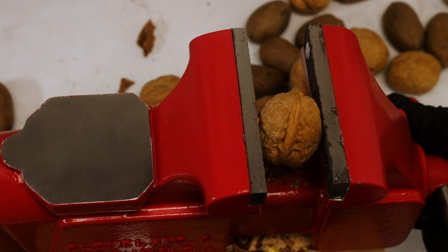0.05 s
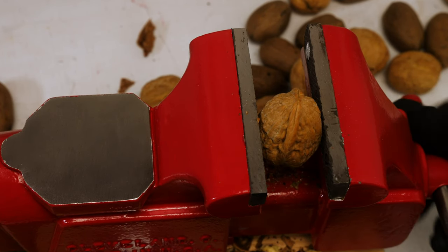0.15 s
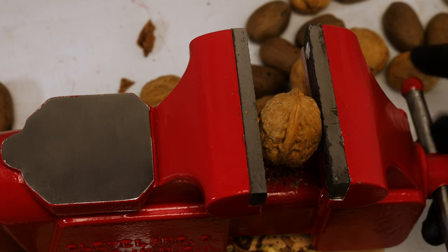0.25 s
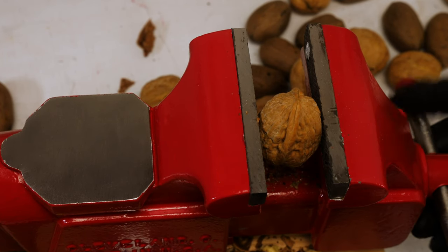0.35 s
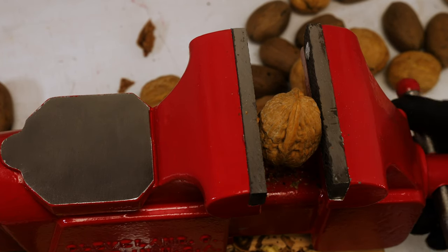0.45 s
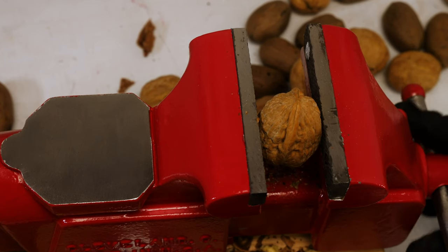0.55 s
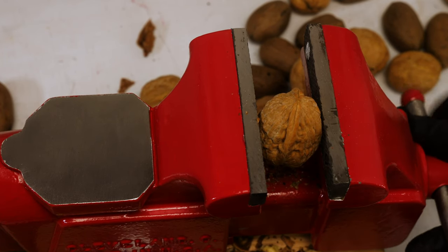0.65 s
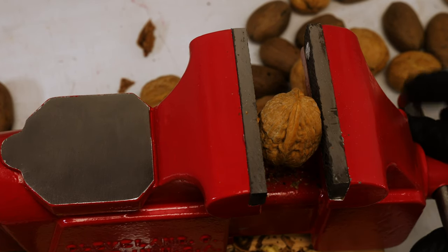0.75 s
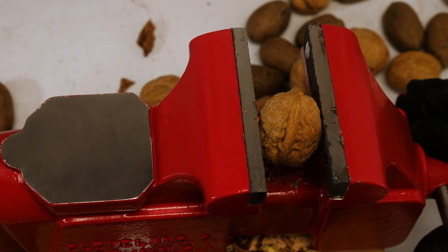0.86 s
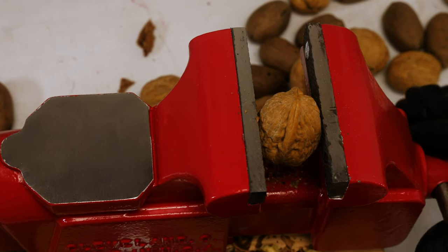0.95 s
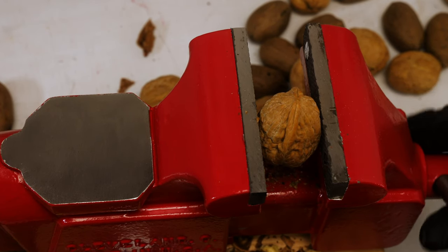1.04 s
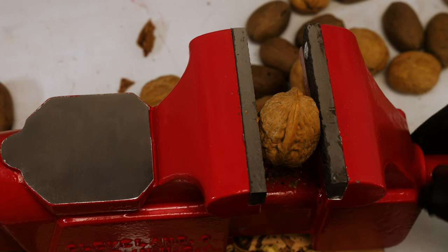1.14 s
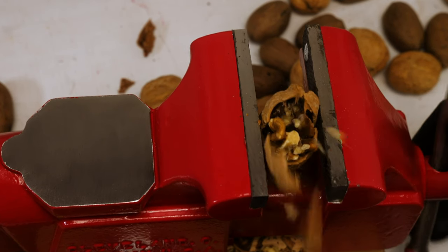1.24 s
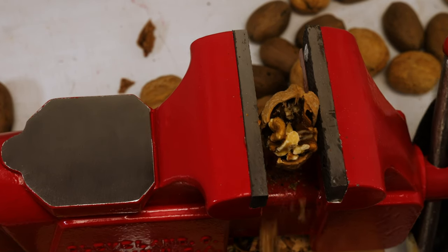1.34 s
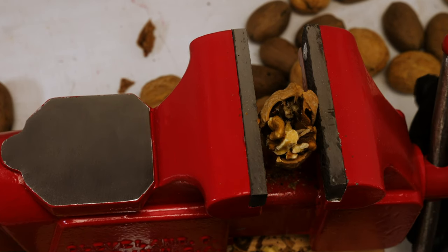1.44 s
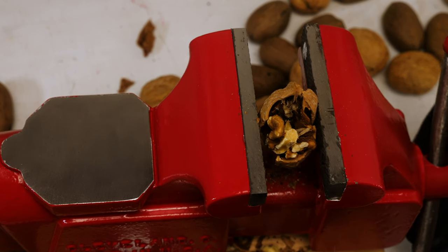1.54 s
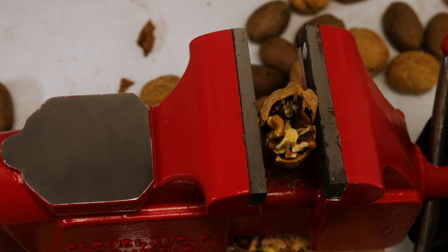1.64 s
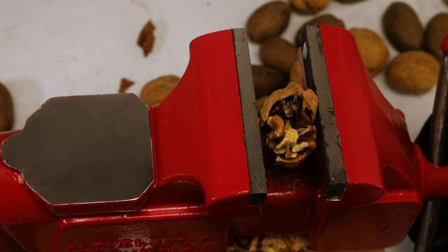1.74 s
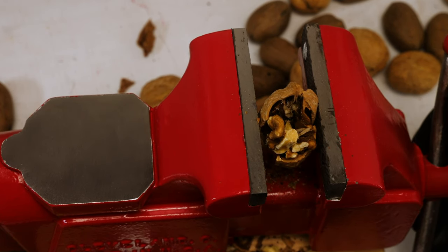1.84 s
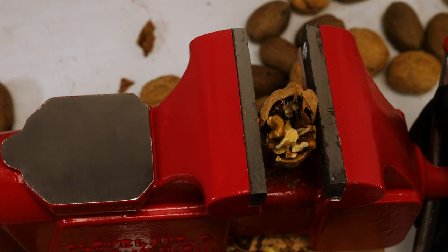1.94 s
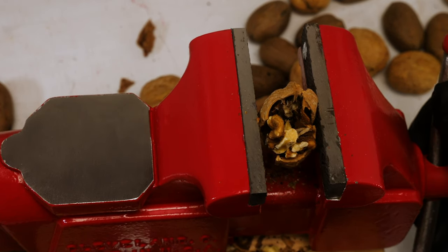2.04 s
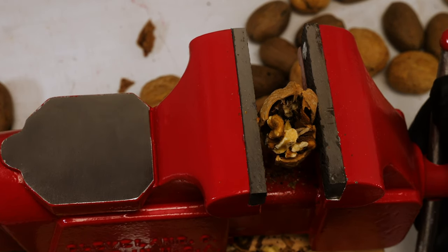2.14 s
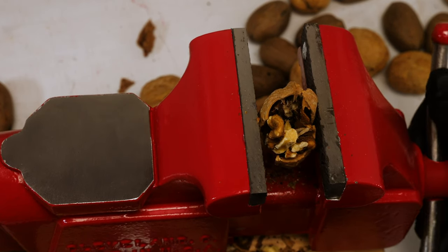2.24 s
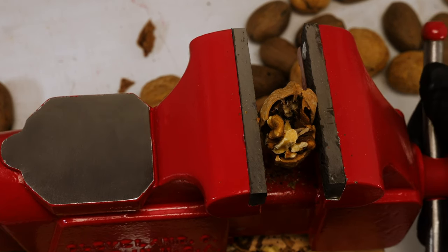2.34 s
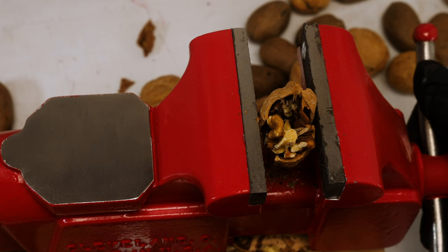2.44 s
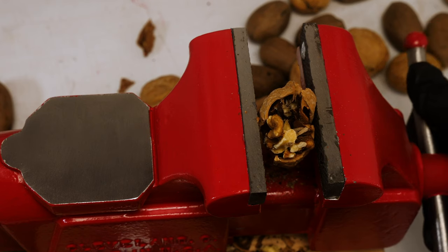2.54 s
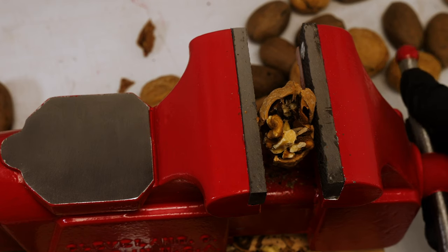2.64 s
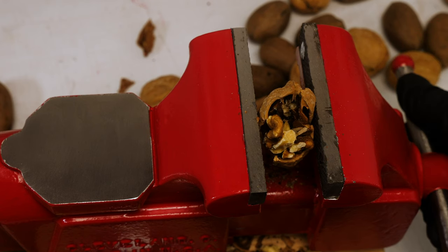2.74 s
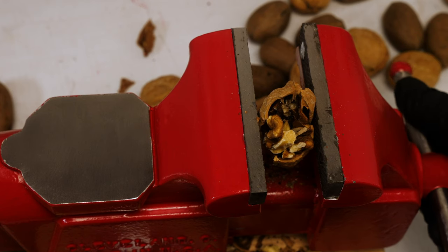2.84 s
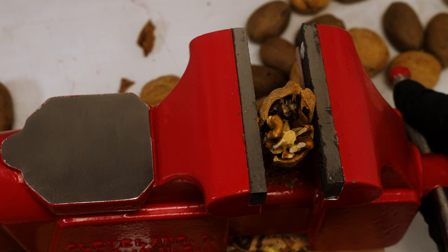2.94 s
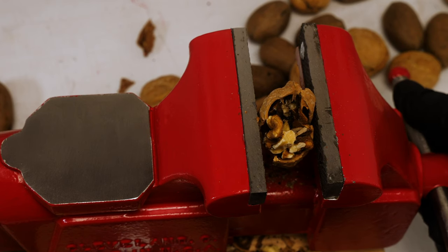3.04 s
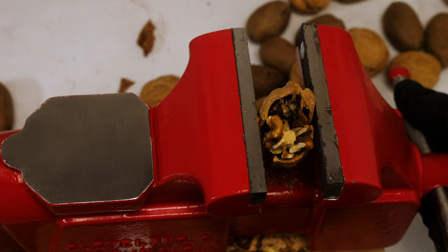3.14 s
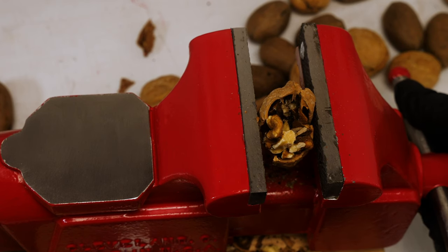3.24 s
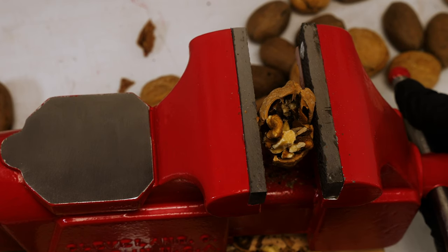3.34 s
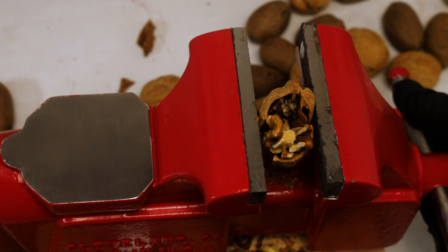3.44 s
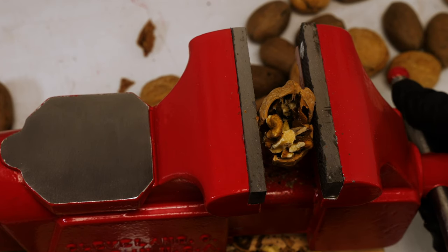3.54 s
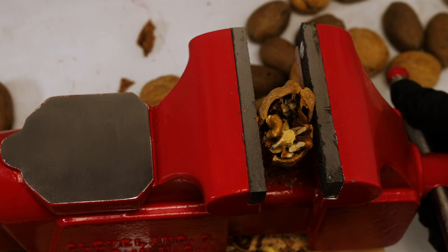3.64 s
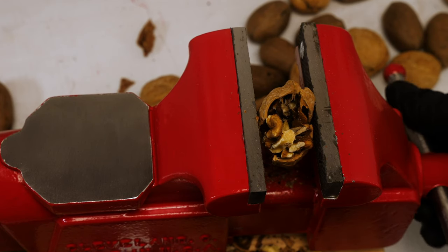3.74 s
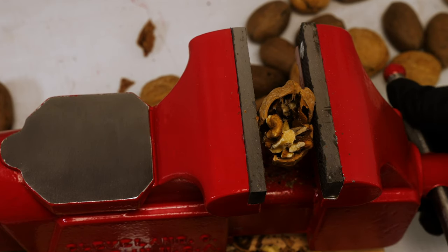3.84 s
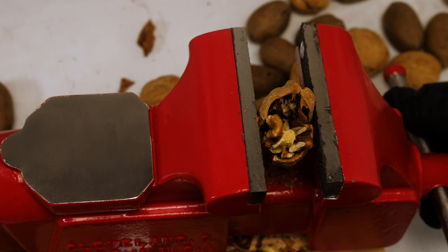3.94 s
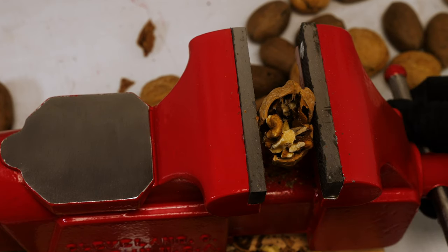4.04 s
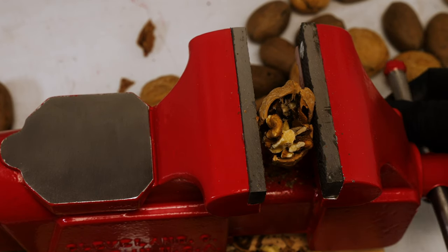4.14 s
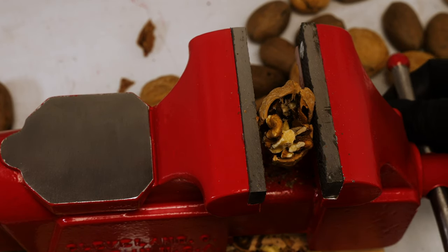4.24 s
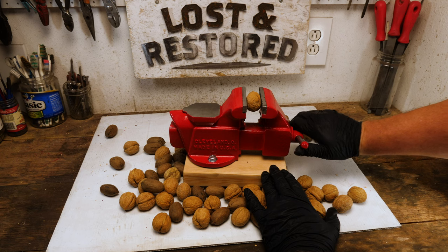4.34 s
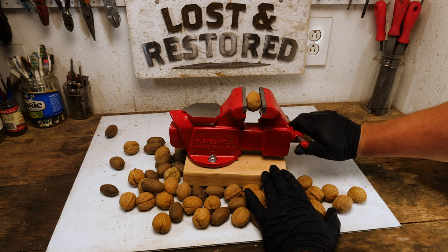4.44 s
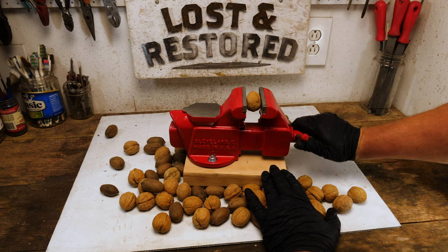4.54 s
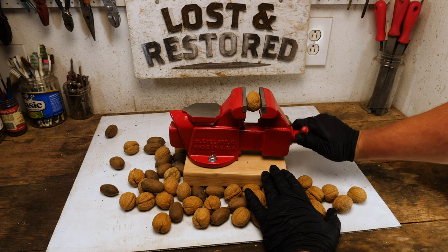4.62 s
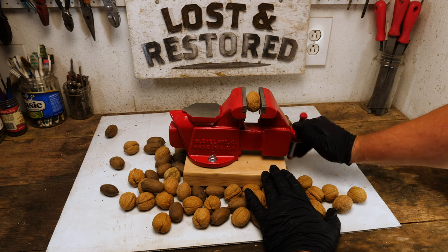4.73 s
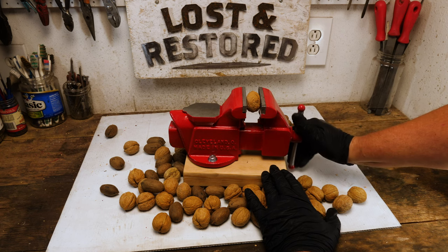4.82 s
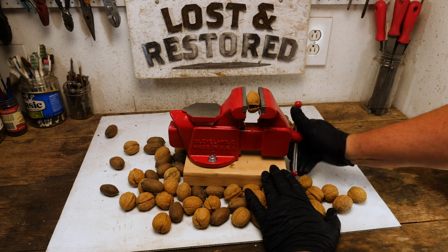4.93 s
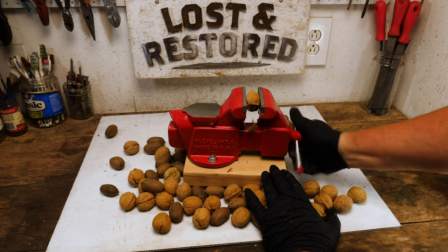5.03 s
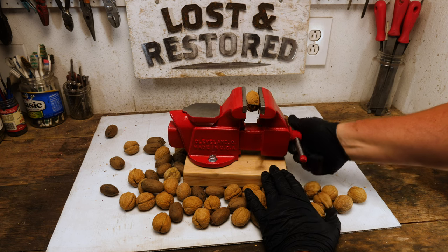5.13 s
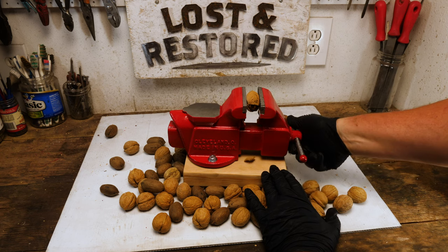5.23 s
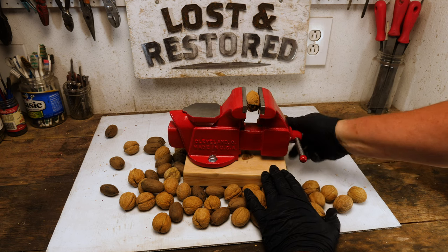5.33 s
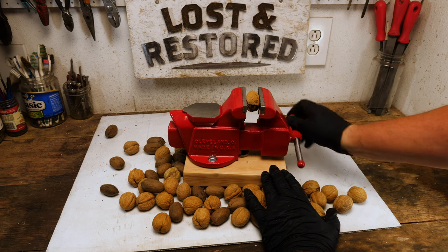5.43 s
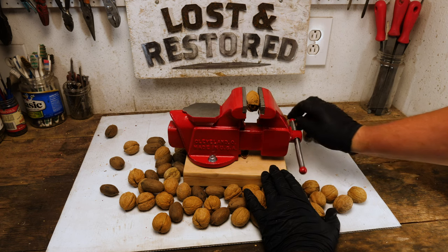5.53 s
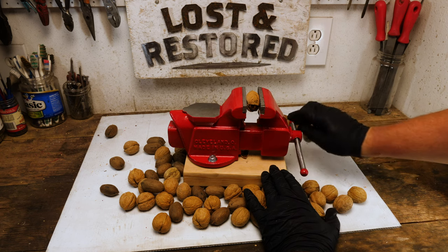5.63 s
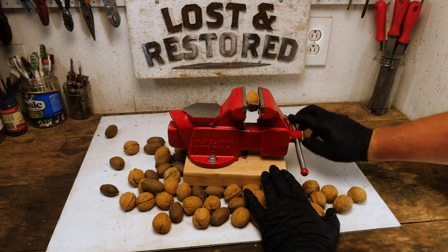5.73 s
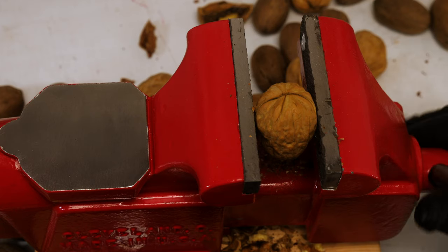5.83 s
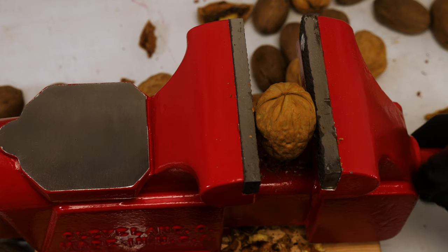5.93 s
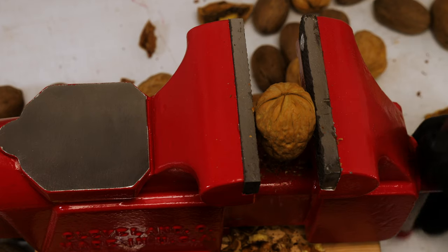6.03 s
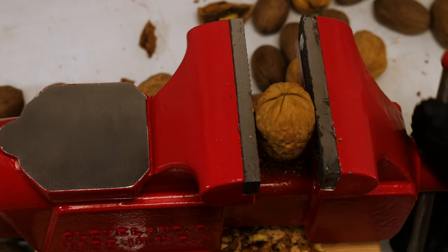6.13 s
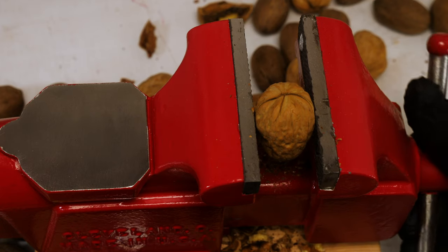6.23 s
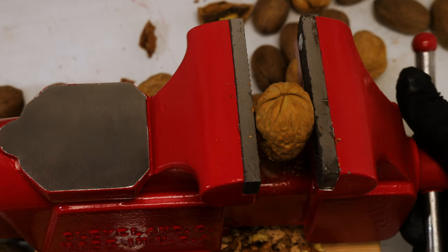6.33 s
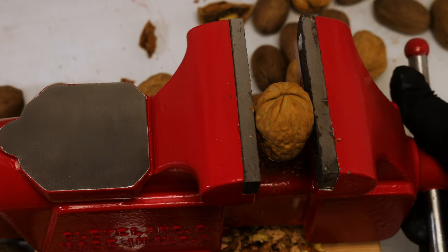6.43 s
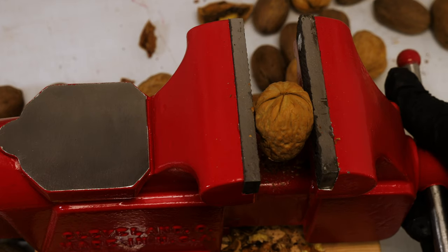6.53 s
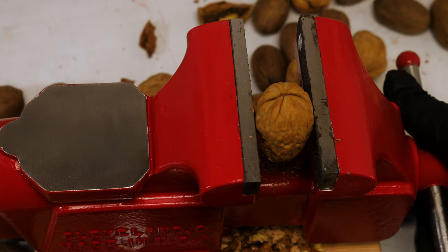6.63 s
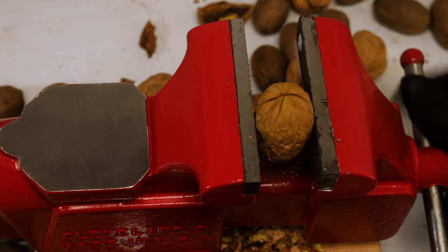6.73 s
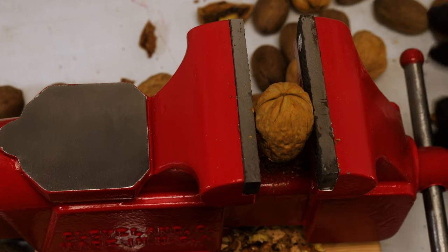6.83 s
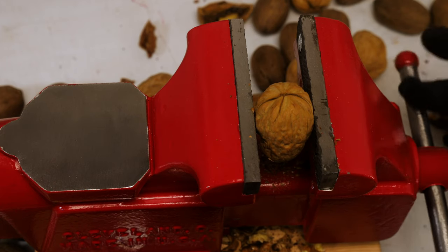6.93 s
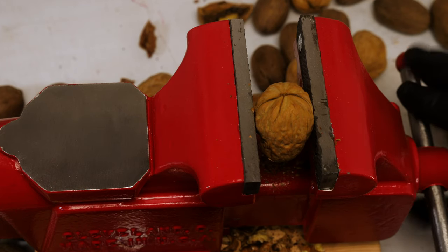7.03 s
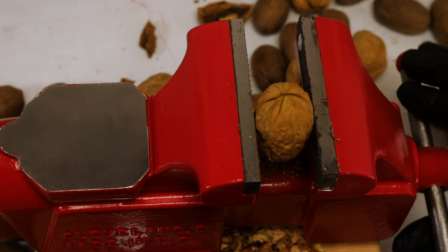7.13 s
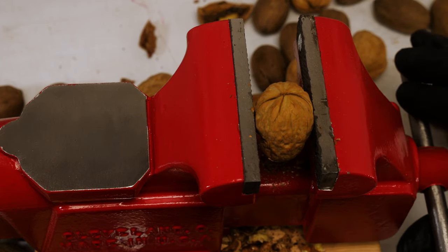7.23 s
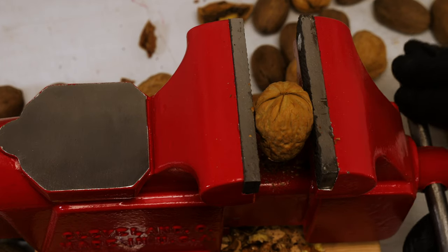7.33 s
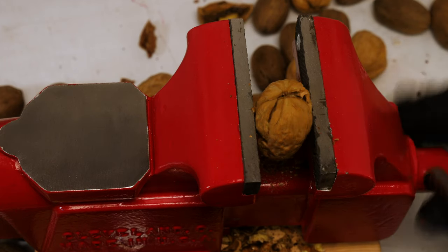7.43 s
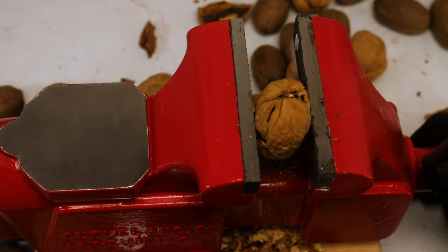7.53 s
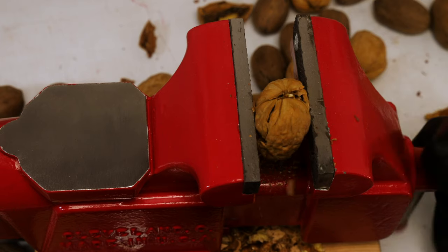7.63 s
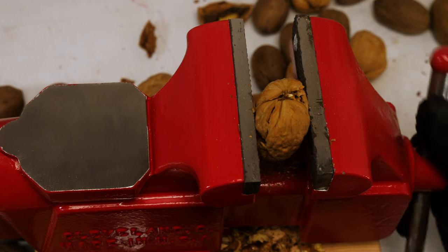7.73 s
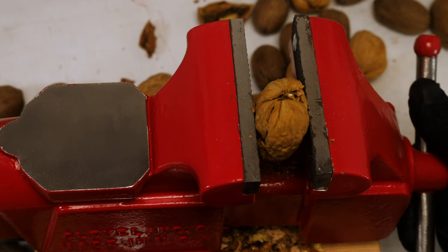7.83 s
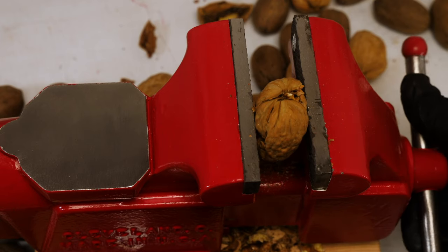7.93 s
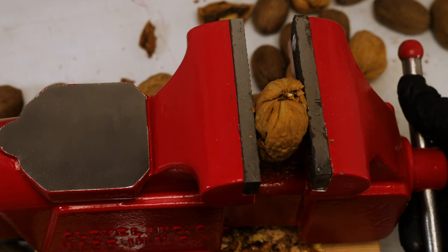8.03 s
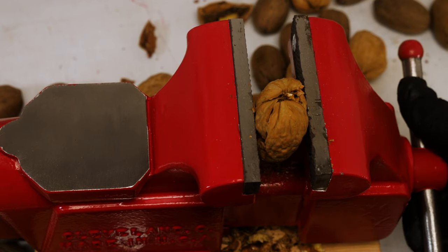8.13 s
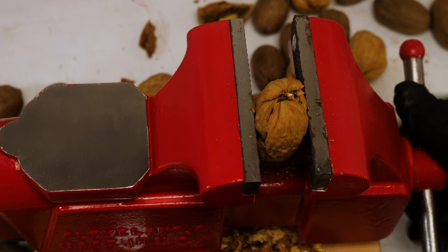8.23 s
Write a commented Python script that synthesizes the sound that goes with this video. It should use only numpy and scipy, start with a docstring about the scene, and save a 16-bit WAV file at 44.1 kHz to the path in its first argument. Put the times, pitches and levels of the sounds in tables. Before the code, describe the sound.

Close view of walnuts being crushed in a bench vise in a small, dry workshop. A sharp crack opens, the steel handle rattles, then a heavy burst scatters ticking crumbs. After a quiet stretch with faint ticks, a dense volley of snaps follows, then more separate cracks, a handle slide, a hard double crack with a thud, a brief raspy squeak and a last snap.

```python
"""Walnuts crushed in a bench vise

Shells tick, snap and burst: impulses coloured by shell resonances, answered by a small workshop.
The bench thuds and the iron clanks as struck modes; the steel handle rattles as resonant chatter.
Crumbs settle as sparse ticks; near the end a shell squeaks by stick-slip against the jaws.
Coloured noise makes room air, bench rumble and hiss; dry low clicks, as of overload, mark four snaps."""
import sys
import numpy as np
from scipy import signal
from scipy.fft import rfft, irfft, next_fast_len
from scipy.io import wavfile
from scipy.ndimage import uniform_filter1d, map_coordinates

SR = 44100
rng = np.random.default_rng(int(sys.argv[2]) if len(sys.argv) > 2 else 0)


def generate_wav(signal):
    """Clip the signal to [-1, 1] and save it as 16-bit WAV at the path in sys.argv[1]."""
    frames = np.transpose(np.atleast_2d(signal))
    scaled = np.clip(frames, -1, 1) * 32767
    pcm = np.round(scaled).astype(np.int16)
    wavfile.write(sys.argv[1], SR, pcm)


N = 364690
ANSWER_SAMPLES = 16384
TOP_HZ = 16000

# Decay of the workshop. Each row: frequency in Hz, t60 in seconds.
ROOM_T60 = [(200, 0.23), (800, 0.19), (2500, 0.2), (6000, .16), (15000, 0.14)]
# Spectrum of still air. Each row: frequency in Hz, relative density in dB per Hz.
AIR_SPECTRUM = [(18, -33.5), (30, -1), (64, -5.5), (153, -16.5), (194, -7.5), (221, -18.5), (252, -14),
                (684, -21.5), (988, -23), (11700, -42), (16000, -36.5)]
# Spectrum of the bench rumble. Each row: frequency in Hz, relative density in dB per Hz.
RUMBLE_SPECTRUM = [(12, -28), (20, 1.5), (64, 1.5), (107, -10), (200, -18), (260, -41.5), (440, -120)]
# Spectrum of the hiss. Each row: frequency in Hz, relative density in dB per Hz.
HISS_SPECTRUM = [(590, -28.5), (1000, 1), (1340, -25), (1540, -8), (2080, -1.5), (11000, 2.5), (16000, -18)]
# The arm leans on the bench. Each row: middle in seconds, level in dB, half length in seconds.
LEANS = [(.3, -57.5, 0.23), (1, -62, 0.38), (2.1, -63, 0.1), (3.98, -62.5, 0.085), (5.3, -52.5, 0.31)]
# Glove and screw rub during a turn. Each row: middle in seconds, relative level in dB, half length in seconds.
RUBS = [(.65, -69, 0.05), (.88, -67, 0.058), (4.38, -71.5, 0.15), (5.28, -59, 0.18), (5.87, -62, 0.056),
        (6.79, -64.5, 0.17), (7.85, -61, 0.11), (8.2, -55.5, .12)]
FIZZ_DB, FIZZ_DB_PER_S = -64, 63.5  # strained shell fizzes on after a crack
SWAY_DB, SWAY_DB_PER_S = -58, 46.5  # the bench rumbles on after a jolt

# The vise rocks back or the hand bumps it. Each row: start in seconds, level in dB.
THUDS = [(1.352, -35), (3.72, -72), (4.32, -56), (6.046, -49), (6.799, -58.5), (7.06, -45), (7.587, -39.5)]
# Modes of bench and vise base. Each row: frequency in Hz, relative level in dB.
BENCH_MODES = [(34, -8.5), (64, -4), (92, -4), (118, -6), (150, -9.5), (180, 1), (198, 5), (245, -8.5),
               (335, -7)]
JOLT_DB = -45.5  # bench thud relative to the knock of a crack
# Knocks of the handle in the screw head. Each row: start in seconds, level in dB.
CLANKS = [(1.335, -34.5), (5.146, -29.5), (5.321, -49.5), (5.553, -45), (6.44, -37.5), (7.552, -35)]
# Modes of iron and handle. Each row: frequency in Hz, relative level in dB.
IRON_MODES = [(412, -8), (520, -14.5), (795, -5.5), (940, -3), (1058, 1), (1323, -9.5), (1560, -1.5),
              (1770, -7.5)]

# Shell crumbs settle after the first walnut bursts. Each row: time in seconds, level in dB.
CRUMB_LEVEL = [(1.33, -42), (1.55, -79.5), (1.85, -56.5), (2.22, -72)]
# Spectrum of the crumbs. Each row: frequency in Hz, relative density in dB per Hz.
CRUMB_SPECTRUM = [(300, -20), (600, -1.5), (1100, -2), (2800, -5.5), (6000, -12.5), (11000, -16),
                  (16000, -32.5)]

# The handle slides in its hole. Each row: start in seconds, relative level in dB,
# rise time constant in seconds, t60 in seconds (above the hum).
SLIDES = [(0.306, -34, 0.027, 0.24), (0.376, -43, .003, .3), (0.464, -55, 0.012, 0.43),
          (.653, -63.5, .008, 0.38), (0.763, -30.5, 0.00092, 0.13), (0.895, -40.5, 0.021, 0.22),
          (2.59, -66.5, 0.016, 0.49), (3.618, -61.5, 0.0093, 0.34), (4.228, -55, .002, 0.16),
          (4.32, -54, .002, .17), (5.354, -50, 0.0018, 0.21), (5.54, -41.5, 0.0053, 0.33),
          (5.6, -42.5, 0.032, 0.44), (7.01, -31, 0.028, .23), (7.16, -51.5, 0.032, 0.29)]
# Nominal handle resonances. Each row: frequency in Hz, width in Hz, relative level in dB.
HANDLE_MODES = [(192, 16, 6.5), (406, 190, -10), (864, 60, -9), (1110, 54, -8), (1781, 24, -6.5),
                (2964, 240, -26.5), (3630, 90, -20)]
# Thin ring of the bar. Each row: frequency in Hz, width in Hz, relative level in dB.
BAR_MODES = [(5546, 90, 0), (10560, 140, -3)]
# Spectrum of the scrape. Each row: frequency in Hz, relative density in dB per Hz.
SCRAPE_SPECTRUM = [(40, -31), (110, -0.5), (200, 0.5), (500, -6.5), (850, -3.5), (1300, -12.5),
                   (1800, -10.5), (3200, -8.5), (6000, -22), (9000, -25), (16000, -37.5)]
HUM_BELOW_HZ, HUM_T60_RATIO = 450, 1.42  # a slowing slide turns dull: its hum outlasts the rest

# Level of the squeak. Each row: time in seconds, relative level in dB.
SQUEAK_LEVEL = [(7.72, -61), (7.798, -43.5), (7.814, -31.5), (7.824, -40.5), (7.84, -24.5), (7.858, -37),
                (7.894, -32), (7.932, -36.5), (7.944, -53), (8.02, -71)]
# Nominal stick-slip rate. Each row: time in seconds, slips per second.
SLIP_RATE = [(7.72, 586), (7.797, 493), (7.815, 394), (7.86, 398), (7.873, 446), (7.893, 390), (7.91, 470),
             (7.95, 380)]
# Response of the squeezed hollow shell. Each row: frequency in Hz, gain in dB.
HOLLOW_RESPONSE = [(150, -30), (330, -19.5), (500, -7), (800, 0), (1100, -12), (1650, -10), (2800, -11.5),
                   (6000, -24)]
SMOOTH_ABOVE_HZ, ROUGH_BELOW_HZ, ROUGHNESS = 457, 390, 0.28  # slow slipping turns rough

# Dry low clicks, as of overload, at four snaps. Each row: start in seconds, level in dB.
LOW_CLICKS = [(1.135, -20.5), (4.8682, -21), (5.936, -18.5), (5.977, -8)]
# Loose pieces drop or shift. Each row: start in seconds, level near 6 kHz in dB, ring in Hz.
CLACKS = [(1.471, -28, 3270), (1.502, -19.5, 1520), (1.512, -9.5, 4650), (1.622, -16, 970),
          (1.824, -13.5, 990), (1.932, -25, 980), (1.999, -27, 1000), (3.589, -31.5, 4100),
          (3.7258, -18.5, 4790), (5.225, -12, 4470), (5.321, -21.5, 1040), (5.468, -25, 1070),
          (5.406, -23.5, 5900), (5.551, -20.5, 1180), (7.8268, -14, 920)]
CLACK_KNOCK_DB, CLACK_BODY_DB, CLACK_SIZZLE_DB, CLACK_RING_DB = 1, 3.5, -3, 11
# Hairline splits under load. Each row: start in seconds, level near 6 kHz in dB,
# relative sizzle in dB, ring in Hz.
TICKS = [(.159, -23, -3, 3300), (0.1936, -16.5, 9, 7160), (1.2417, -8.5, 5.5, 2050), (1.648, -11, -6, 6800),
         (1.7458, -16, -0.5, 1840), (2.251, -9.5, 2.5, 7080), (2.4, -28, 1, 6900),
         (2.708, -28.5, 1.5, 7150), (2.857, -41, -0.5, 6940), (3.025, -44, 5, 7400),
         (3.875, -27.5, -5, 4680), (4.8085, -17.5, 14.5, 2210), (4.934, -16.5, 10.5, 5840),
         (5.009, -18, 7, 4130), (5.0258, -1, -1, 2100), (5.1313, -3.5, 1.5, 6490), (5.7546, -19, 9.5, 7600),
         (5.887, -22, 12, 3780), (5.9034, -10.5, 4, 3300), (6.268, -16.5, -2, 7040), (6.414, -5.5, 3, 7040),
         (6.581, -23.5, 5.5, 7260), (6.67, -33.5, 4, 4440), (7.283, -32.5, 8.5, 7720),
         (7.448, -17, 0.5, 7200), (7.66, -9.5, -2, 4580), (7.666, -4.5, -6, 4260), (7.7302, -18, 6, 7300),
         (7.985, -4.5, -7, 4050), (8.097, -20, 1, 4650), (8.21, -18, 2.5, 4950)]
TICK_KNOCK_DB, TICK_BODY_DB, TICK_RING_DB = -21.5, -4, 10
THIN_ABOVE_HZ, THIN_DB_PER_OCTAVE = 2000, 2.5  # a smaller, higher piece has less body
# The shell breaks. Each row: start in seconds, level near 6 kHz in dB, then relative to it
# knock in dB, body in dB, sizzle in dB; ring of the piece in Hz,
# lead of a first tick in seconds (0: no tick).
CRACKS = [(0.0121, 10.6, -20, -1.5, 0, 2044, 0.0096), (1.1308, 4.6, -17.5, -3, 4.5, 9160, 0.02),
          (1.3229, 15.75, -4, 2, -0.5, 3160, 0.019), (4.635, 6, -21.5, -6, -1, 2130, 0.0015),
          (4.7244, 6.4, -18, -9.5, -2.5, 4140, 0), (4.7622, 10.8, -7.5, -2, 0, 2090, 0.0042),
          (4.8653, 8.2, -15, -9.5, 4.5, 4040, 0.0059), (5.037, 5.8, -5, -1.5, 4, 4720, 0),
          (5.06, 11.8, -5.5, -2, 1, 2820, 0), (5.143, 9.9, -0.5, -3.5, -2, 1053, 0.00075),
          (5.9317, 10.8, -22, -9, 3.5, 2790, 0.00066), (5.9757, 9.8, -13.5, -4.5, 5.5, 9200, 0),
          (6.1656, 7.5, -15, -2.5, -1, 2523, .029), (6.4316, 9.8, -12.5, -6.5, 1, 1567, 0.017),
          (7.535, 9.4, -3, 4.5, 2.5, 3960, 0.013), (7.55, 11.6, 0.5, 5, -1, 4800, 0.019),
          (7.873, 4.6, -3.5, -5, -4, 4340, 0), (8.1526, 1.6, -14.5, .5, -0.5, 4740, 0.0018)]
LEAD_DB, LEAD_SIZZLE_DB = -26, 5.5  # leading tick: level against its crack, own sizzle


def amp(db):
    """Decibels to gain."""
    return 10 ** (np.asarray(db) / 20)


def unit(x):
    """Scale to rms 1."""
    return x / np.sqrt(np.mean(x ** 2) + 1e-20)


def along(points, hz):
    """Read (Hz, value) points on a log frequency axis."""
    points_hz, values = np.transpose(points)
    return np.interp(np.log(hz + 1), np.log(points_hz + 1), values)


def curves(rows):
    """One value per sample for each column after the time."""
    times_s, *columns = np.transpose(rows)
    return [np.interp(np.arange(N) / SR, times_s, column) for column in columns]


def during(rows):
    """A soft gate, open while a table lasts."""
    t = np.arange(N) / SR
    is_open = (t > rows[0][0]) & (t < rows[-1][0])
    return uniform_filter1d(1.0 * is_open, size=400)


def add(track, start_s, sound):
    """Mix a sound into a track."""
    part = track[max(0, round(start_s * SR)):][:len(sound)]
    part += sound[:len(part)]


def filtered(x, response):
    """Multiply the spectrum of x by a response of frequency."""
    size = next_fast_len(len(x) + 8192)
    hz = np.fft.rfftfreq(size, 1 / SR)
    return irfft(rfft(x, size) * response(hz), size)[:len(x)]


def coloured(x, spectrum):
    """x through a (Hz, dB) spectrum, at rms 1."""
    return unit(filtered(x, lambda hz: amp(along(spectrum, hz))))


def resonant(x, modes):
    """x through (Hz, width Hz, dB) resonances of alternating sign, at rms 1."""
    def response(hz):
        total = 0
        for k, (centre_hz, width_hz, db) in enumerate(modes):
            damping = 1j * hz * width_hz
            total = total + (-1) ** k * amp(db) * damping / (centre_hz ** 2 - hz ** 2 + damping)
        return total
    return unit(filtered(x, response))


def causal(db):
    """The minimum-phase response with these dB gains, by folding the cepstrum."""
    cepstrum = irfft(np.log(amp(db)))
    half = len(cepstrum) // 2
    cepstrum[1:half] *= 2
    cepstrum[half + 1:] = 0
    return np.exp(rfft(cepstrum))


def swells(rows):
    """Power of smooth swells given as (middle s, dB, half length s)."""
    t = np.arange(N) / SR
    return sum(amp(db) ** 2 * np.exp(-((t - middle_s) / half_s) ** 2) for middle_s, db, half_s in rows)


def fades(rows, db_per_s):
    """Power that each (s, dB) blow leaves behind, dying at a steady rate."""
    power, t = np.zeros(N), np.arange(2 * SR) / SR
    fade = amp(-db_per_s * t) ** 2
    for start_s, db in rows:
        add(power, start_s, amp(db) ** 2 * fade)
    return power


def jolts(gain_db):
    """The push that each crack gives the bench: (s, dB)."""
    return [(start_s, db + knock_db + gain_db) for start_s, db, knock_db, *_ in CRACKS]


def workshop(direct_db=-15, cluster_s=.0036, tail_db=-5):
    """A fresh room answer: direct sound, near reflections of bench top and close wall, short tail."""
    t = np.arange(ANSWER_SAMPLES) / SR
    hz, frames_s, z = signal.stft(rng.standard_normal(ANSWER_SAMPLES), SR, nperseg=128)
    decay = amp(-60 * frames_s / along(ROOM_T60, hz)[:, None])
    tail = signal.istft(z * decay, SR, nperseg=128)[1][:ANSWER_SAMPLES]
    swell = (t / cluster_s) ** 2 * np.exp(2 - 2 * t / cluster_s)
    cluster = swell * rng.standard_normal(ANSWER_SAMPLES)
    echoes = cluster + amp(tail_db) * tail * (1 - np.exp(-2 * t / cluster_s))
    # uneven strength in steps of 16 samples
    echoes *= amp(1.5 * np.repeat(rng.standard_normal(ANSWER_SAMPLES // 16), 16))
    echoes /= np.linalg.norm(echoes)
    echoes[:24] += amp(direct_db) * unit(rng.standard_normal(24)) / np.sqrt(24)
    return echoes


def background(air_db=-71, rumble_floor_db=-73, hiss_floor_db=-80, rub_db=-2):
    """Still air; the bench rumbles when leaned on or jolted; glove, screw and strained shell hiss."""
    def noise(spectrum):
        return coloured(rng.standard_normal(N), spectrum)

    sway = fades(jolts(SWAY_DB), SWAY_DB_PER_S)
    rumble_power = amp(rumble_floor_db) ** 2 + swells(LEANS) + sway
    fizz = fades([(start_s, db + FIZZ_DB) for start_s, db, *_ in CRACKS], FIZZ_DB_PER_S)
    hiss_power = amp(hiss_floor_db) ** 2 + amp(rub_db) ** 2 * swells(RUBS) + fizz
    air = amp(air_db) * noise(AIR_SPECTRUM)
    rumble = np.sqrt(rumble_power) * noise(RUMBLE_SPECTRUM)
    hiss = np.sqrt(hiss_power) * noise(HISS_SPECTRUM)
    return air + rumble + hiss


def struck(blows, modes, t60_at_1khz_s, attack_s, scatter_db):
    """Blows ring the same modes at new strengths; low ones last longer, loose contact blurs pitch."""
    out, t = np.zeros(N), np.arange(SR // 2) / SR
    for start_s, db in blows:
        for hz, mode_db in modes:
            t60_s = t60_at_1khz_s * (hz / 1000) ** -.3
            # random walk of phase
            blur = np.cumsum(rng.standard_normal(len(t))) * np.sqrt(3 * np.sqrt(hz) / SR)
            ring = rng.choice([-1, 1]) * np.sin(2 * np.pi * hz * t + blur)
            ring *= 1 - np.exp(-t / attack_s)
            level_db = db + mode_db + scatter_db * rng.normal() - 60 * t / t60_s
            add(out, start_s, amp(level_db) * ring)
    return out


def bench():
    """Low modes of bench and vise base, driven by cracks and bumps."""
    return struck(jolts(JOLT_DB) + THUDS, BENCH_MODES, t60_at_1khz_s=.19, attack_s=0.011, scatter_db=0.5)


def iron():
    """Modes of iron and handle, driven by knocks in the screw head."""
    return struck(CLANKS, IRON_MODES, t60_at_1khz_s=0.2, attack_s=0.0062, scatter_db=1.5)


def crumbs(ticks_per_s=95):
    """Dense tiny ticks of uneven size, each answered by the room."""
    hits = rng.random(N) < ticks_per_s / SR
    grains = hits * rng.choice([-1, 1], N) * amp(3 * rng.standard_normal(N))
    grains = signal.fftconvolve(grains, workshop())[:N]
    return coloured(grains, CRUMB_SPECTRUM) * amp(curves(CRUMB_LEVEL)[0]) * during(CRUMB_LEVEL)


def handle(ring_db=-2.5, scrape_db=-2.0, bar_db=-13, rub=0.035, hum_db=-2, contacts_per_s=130):
    """The bar chatters through its hole; each slide grips it elsewhere and shifts its resonances."""
    out, t = np.zeros(N), np.arange(2 * ANSWER_SAMPLES) / SR
    for start_s, db, rise_s, t60_s in SLIDES:
        contacts = rng.random(len(t)) < contacts_per_s / SR
        chatter = rng.standard_normal(len(t)) * (rub + contacts)
        chatter = signal.fftconvolve(chatter, workshop())[:len(t)]
        gripped = [(hz * (1 + .03 * rng.normal()), width_hz, mode_db + 3 * rng.normal())
                   for hz, width_hz, mode_db in HANDLE_MODES]
        steel = amp(ring_db) * resonant(chatter, gripped)
        steel += amp(bar_db) * resonant(chatter, BAR_MODES)
        steel += amp(scrape_db) * coloured(chatter, SCRAPE_SPECTRUM)
        hum = filtered(steel, lambda hz: 1 / (1 + (hz / HUM_BELOW_HZ) ** 4))
        slowing = (steel - hum) * amp(-60 * t / t60_s)
        slowing += hum * amp(hum_db - 60 * t / (t60_s * HUM_T60_RATIO))
        add(out, start_s, amp(db) * (1 - np.exp(-t / rise_s)) * slowing)
    return out


def squeak(jitter=0.13, wet_db=-7, gain_db=3, rasp_db=-3, smooth_db=5):
    """The shell stick-slips on the jaw as harmonics; slower slipping is brighter and raspier."""
    (rate_hz,), (db,) = curves(SLIP_RATE), curves(SQUEAK_LEVEL)
    slowness = (SMOOTH_ABOVE_HZ - rate_hz) / (SMOOTH_ABOVE_HZ - ROUGH_BELOW_HZ)
    rough = ROUGHNESS * np.clip(slowness, 0, 1)
    waver = unit(uniform_filter1d(rng.standard_normal(N), size=130))
    phase = 2 * np.pi * np.cumsum(rate_hz * (1 + jitter * rough * waver)) / SR
    step = amp(-smooth_db * np.clip(1 - 2 * rough, 0, 1))  # gain from one harmonic to the next
    slips = sum(step ** k * np.cos((k + 1) * phase) for k in range(8))
    # noise pulsing once per slip
    slips += amp(rasp_db) * 10 * rough * (1 + np.cos(phase)) * rng.standard_normal(N) / 2
    slips = filtered(slips, lambda hz: amp(along(HOLLOW_RESPONSE, hz)))
    slips = slips * amp(db + gain_db) * during(SQUEAK_LEVEL)
    return slips + amp(wet_db) * signal.fftconvolve(slips, workshop(tail_db=3))[:N]


def low_clicks(width_s=.00035):
    """One short low pulse with no ring and no room, like an overload click."""
    out, u = np.zeros(N), np.arange(ANSWER_SAMPLES) / SR / width_s
    for start_s, db in LOW_CLICKS:
        add(out, start_s, amp(db) * (1 - u) * np.exp(-u))
    return out


def fracture(db, knock_db, body_db, sizzle_db, ring_hz, ring_db=9.0, ring_width=0.1,
             ripple_db=2.5, gain_db=1.5, shell_db=3):
    """An impulse coloured by one piece of shell, with its own irregular resonances, in the room."""
    hz = np.fft.rfftfreq(ANSWER_SAMPLES, 1 / SR)

    def peak(centre_hz):
        return 1 / (1 + ((hz / centre_hz - 1) / ring_width) ** 2)

    colour = along([(40, knock_db - 6), (200, knock_db), (430, knock_db - 5), (1000, knock_db + 1),
                    (1700, body_db - 1), (3000, body_db - 1), (4800, -2.9), (7000, -0.49),
                    (9500, sizzle_db), (12000, sizzle_db), (16000, sizzle_db - 5)], hz)
    ring = np.maximum(ring_db * peak(ring_hz), shell_db * peak(9400))  # all shells share 9400 Hz
    ripple = ripple_db * map_coordinates(rng.standard_normal(80), [np.sqrt(hz) / 2], mode="nearest")
    return amp(db + gain_db) * irfft(rfft(workshop()) * causal(colour + ring + ripple))


def clacks():
    """Loose pieces land with the same dull colour, each with its own ring."""
    out = np.zeros(N)
    for start_s, db, ring_hz in CLACKS:
        piece = fracture(db, CLACK_KNOCK_DB, CLACK_BODY_DB, CLACK_SIZZLE_DB, ring_hz, ring_db=CLACK_RING_DB)
        add(out, start_s, piece)
    return out


def ticks():
    """Hairline splits, thin and with hardly any knock, each ringing a small piece of shell."""
    out = np.zeros(N)
    for start_s, db, sizzle_db, ring_hz in TICKS:
        body_db = TICK_BODY_DB - THIN_DB_PER_OCTAVE * np.log2(ring_hz / THIN_ABOVE_HZ)
        split = fracture(db, TICK_KNOCK_DB, body_db, sizzle_db, ring_hz, ring_db=TICK_RING_DB)
        add(out, start_s, split)
    return out


def cracks():
    """The loud breaks, some announced by a bright tick as the split starts."""
    out = np.zeros(N)
    for start_s, db, knock_db, body_db, sizzle_db, ring_hz, lead_s in CRACKS:
        add(out, start_s, fracture(db, knock_db, body_db, sizzle_db, ring_hz))
        if lead_s > 0:
            lead = fracture(db + LEAD_DB, TICK_KNOCK_DB, TICK_BODY_DB, LEAD_SIZZLE_DB, ring_hz)
            add(out, start_s - lead_s, lead)
    return out


def scene():
    """All sources at one microphone."""
    metal_and_wood = bench() + iron() + handle()
    shells = crumbs() + squeak() + clacks() + ticks() + cracks()
    return (background() + metal_and_wood + low_clicks() + shells)[None]


def record(dry, ceiling=0.4):
    """Peaks are rounded off softly, then a steep low-pass sets the band limit."""
    rounded = dry[0] / (1 + (dry[0] / ceiling) ** 4) ** (1 / 4)
    return filtered(rounded, lambda hz: 1 / np.sqrt(1 + (hz / TOP_HZ) ** 200))[None]


dry = scene()
out = record(dry)
generate_wav(out)
```